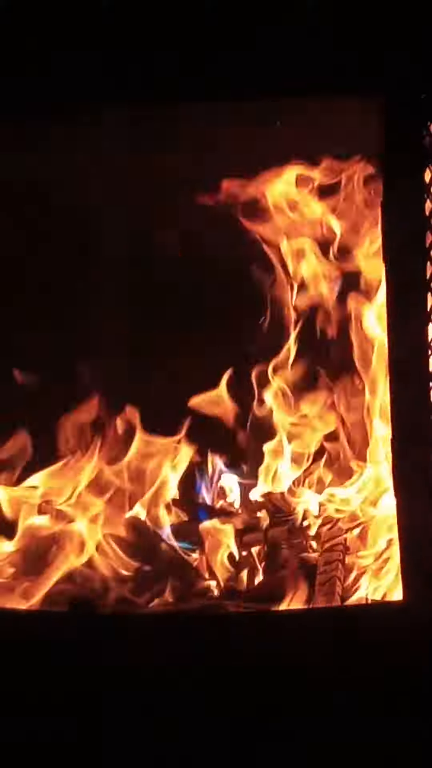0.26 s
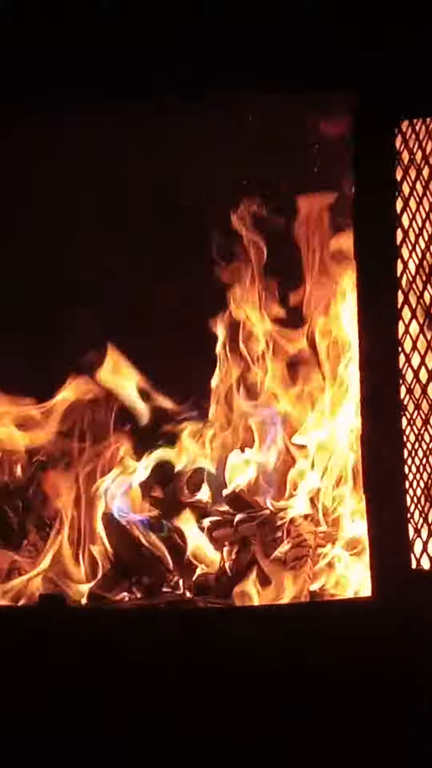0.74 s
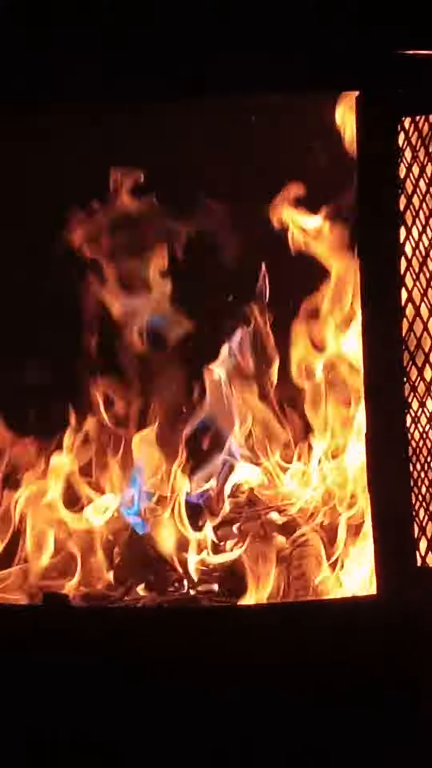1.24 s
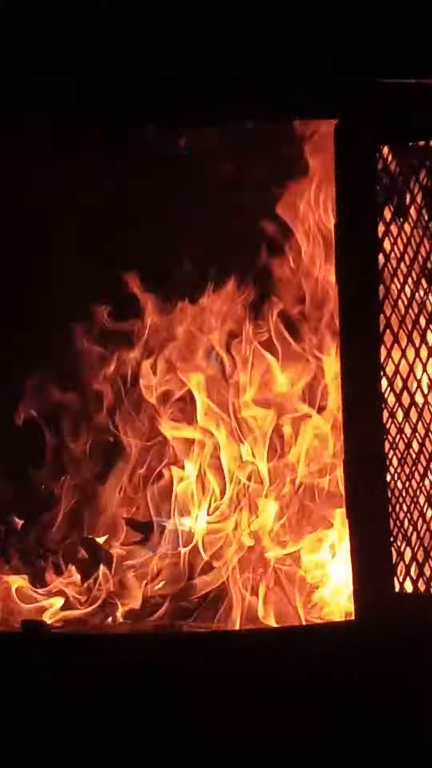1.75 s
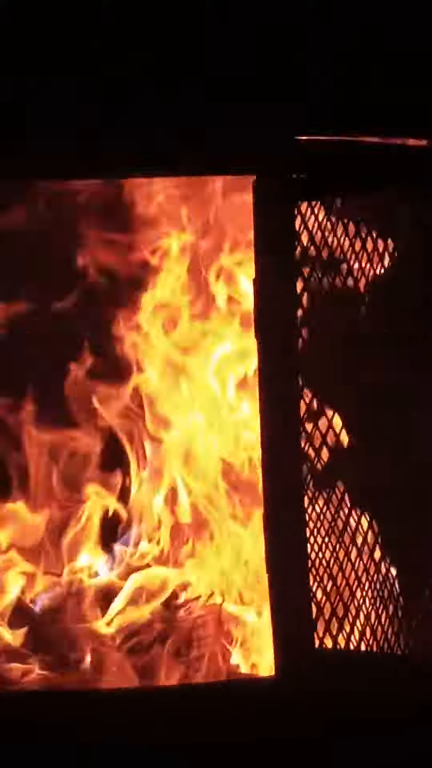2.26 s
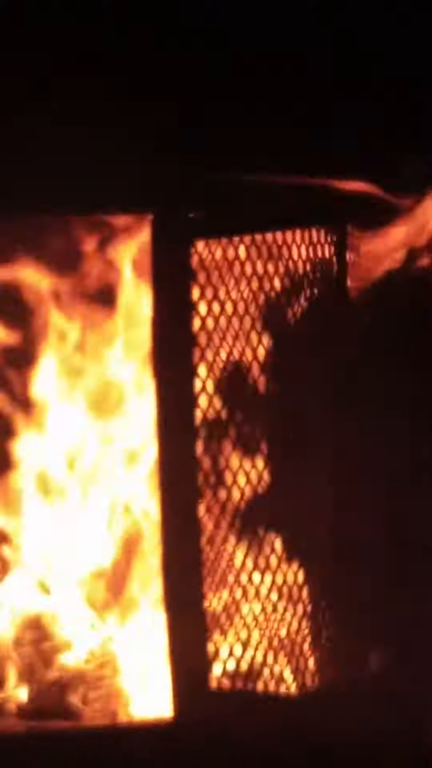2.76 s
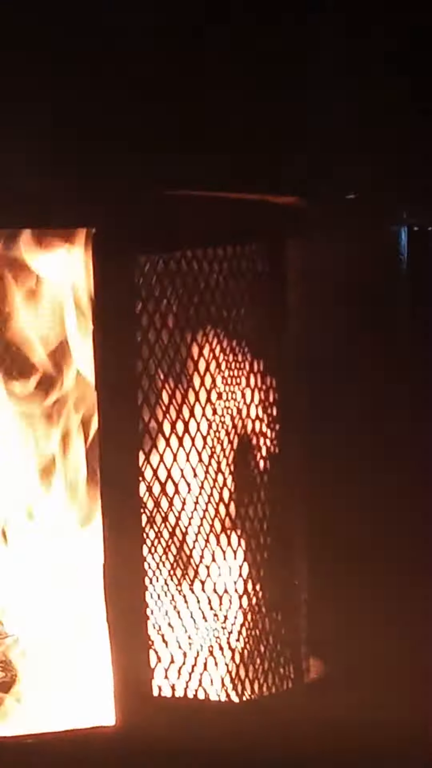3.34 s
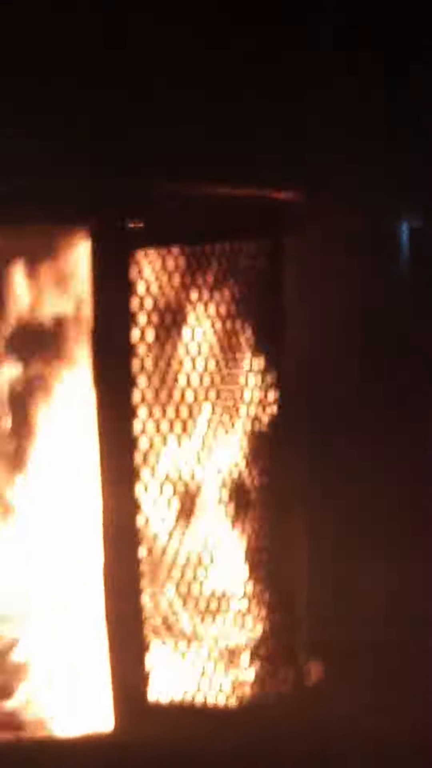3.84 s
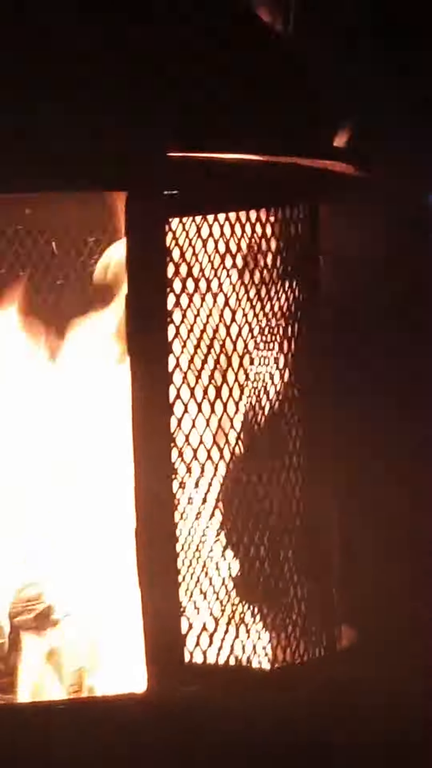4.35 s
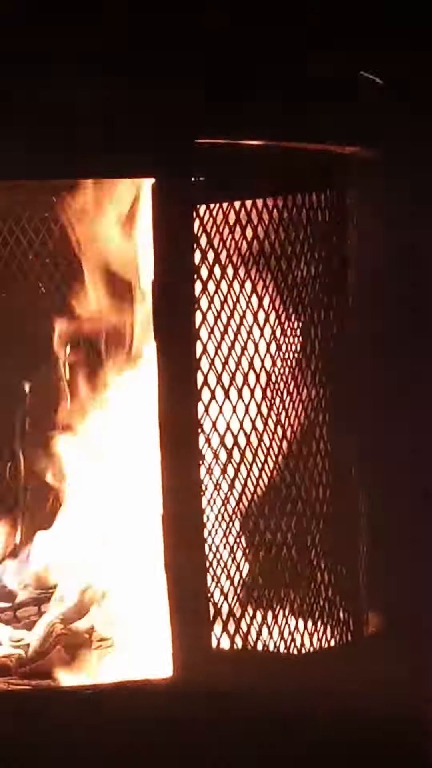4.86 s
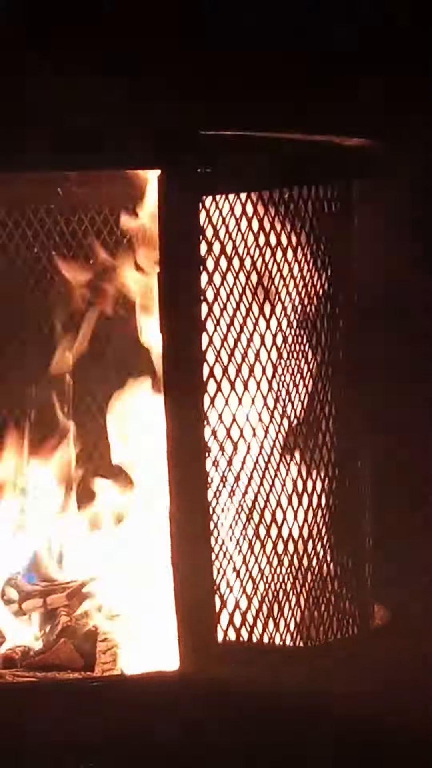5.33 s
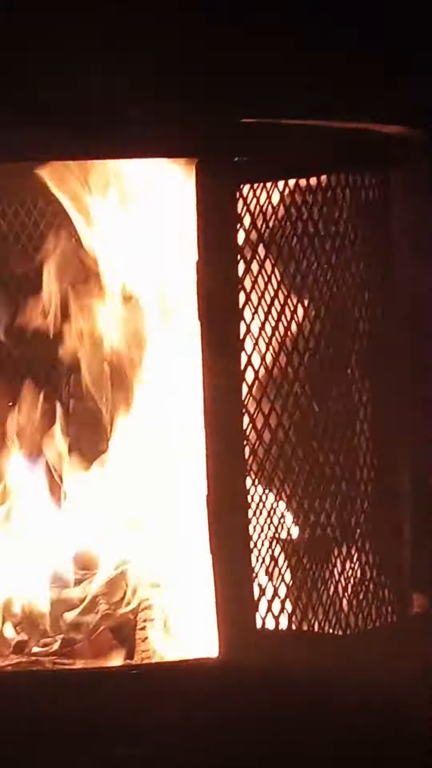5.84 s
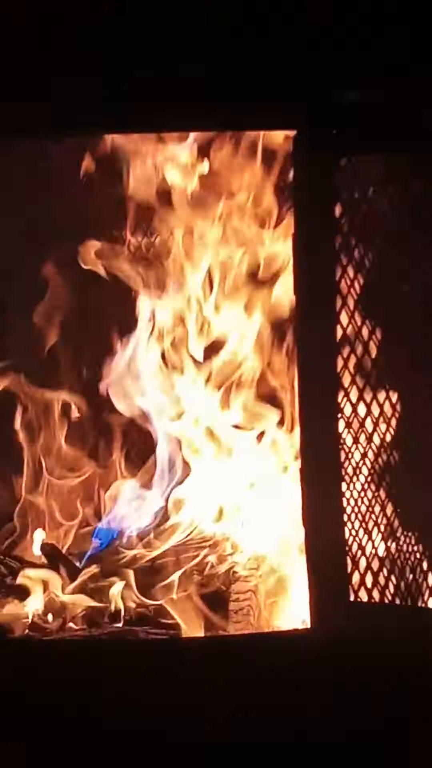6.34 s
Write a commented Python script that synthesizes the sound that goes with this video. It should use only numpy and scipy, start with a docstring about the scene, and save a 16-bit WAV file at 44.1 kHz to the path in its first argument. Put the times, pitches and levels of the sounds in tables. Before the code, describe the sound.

Dry snaps, tiny ticks and occasional hard pops burst from burning logs in a steel fire pit, with brief gas hisses between.

```python
"""A sharp pop opens the scene, then cracks and faint ticks scatter over a softly fluttering, hissing wood fire.
The place is a steel fire pit outdoors at night, with a small microphone close to it.
Gas pockets burst in the logs: each pop is a short noise burst in the resonances of pit and microphone.
A nearby wall answers once and the yard dies away; cracks go on hissing as noise through sliding resonances.
Flames are patchy noise over steadier hiss; low rumbles give their puffs and the thumps under the loudest pops."""
import sys
import numpy as np
from scipy import signal
from scipy.fft import rfft, irfft, next_fast_len
from scipy.io import wavfile
from scipy.ndimage import uniform_filter1d, map_coordinates

SR = 44100
rng = np.random.default_rng(int(sys.argv[2]) if len(sys.argv) > 2 else 0)


def unload_audio(sound):
    """Save the sound as a 16-bit wav file, at the path given as the first command line argument."""
    columns = np.transpose(np.atleast_2d(sound))
    # keep every value between -1 and 1, then stretch to whole-number steps
    steps = np.round(np.clip(columns, -1, 1) * 32767)
    wavfile.write(sys.argv[1], SR, steps.astype(np.int16))


N = 290619


def amp(db):
    """Gain of a level in dB."""
    return 10 ** (np.asarray(db) / 20)


def unit(x):
    """x at rms 1."""
    return x / np.sqrt(np.mean(x ** 2) + 1e-20)


def along(points, hz):
    """Read a curve of (frequency, value) points on a log frequency axis."""
    f, v = np.transpose(points)
    return np.interp(np.log(hz + 1), np.log(f + 1), v)


def wobble(rate):
    """A smooth random curve, rate knots a second."""
    knots = rng.standard_normal(int(N * rate / SR) + 4)
    return map_coordinates(knots, [np.arange(N) * rate / SR])


def filtered(x, response):
    """x times a complex response of frequency."""
    m = next_fast_len(x.shape[-1] + 8192)
    spectrum = rfft(x, m) * response(np.fft.rfftfreq(m, 1 / SR))
    return irfft(spectrum, m)[..., :x.shape[-1]]


def resonance(f, hz, width_hz):
    """A causal resonance of peak gain 1, applied twice for steep skirts."""
    return (1j * f * width_hz / (hz * hz - f * f + 1j * f * width_hz)) ** 2


def rush(spectrum, patchy_db, patch_shape):
    """Noise of rms 1 with patches of random gain; patch_shape = (bins, frames)."""
    z = signal.stft(rng.standard_normal(N), nperseg=1024)[2]
    field = uniform_filter1d(rng.standard_normal(z.shape), size=patch_shape[0], axis=0)
    field = uniform_filter1d(field, size=patch_shape[1], axis=1)
    noise = signal.istft(z * amp(patchy_db * unit(field)), nperseg=1024)[1][:N]
    return unit(filtered(noise, lambda hz: amp(along(spectrum, hz))))


# colour of the flutter: (frequency [Hz], relative level per Hz [dB])
FLUTTER_SPECTRUM = [(15, -81), (25, -50), (81, -15), (198, -0.5), (335, -5), (372, -11.5), (525, -15),
                    (900, -13), (1170, -47), (1980, -120)]
# colour of the burning gas: (frequency [Hz], relative level per Hz [dB])
HISS_SPECTRUM = [(180, -34), (300, -7), (549, -1), (987, -13), (1400, -4), (2130, -14), (2480, -8.5),
                 (2740, -15), (4850, -19.5), (5190, -19), (6450, -17.5), (7630, -27.5), (8730, -30),
                 (15200, -16), (16500, -35)]
# course of the flutter, before its random wobble: (time [s], level [dB])
FLUTTER_COURSE = [(0.0, -74), (0.53, -77.5), (1.3, -72), (1.54, -70), (1.78, -80), (2.31, -72), (2.62, -68),
                  (2.81, -77), (3.06, -80.5), (3.28, -77), (3.43, -74), (4.59, -74), (5.19, -72.5),
                  (5.43, -76.5), (6.22, -74), (6.59, -71)]
HISS_DB = -72.5


def flames():
    """Flames flutter in narrow rolling patches of low noise; burning gas hisses more evenly above."""
    flutter_db = np.interp(np.arange(N) / SR, *np.transpose(FLUTTER_COURSE))
    flutter = rush(FLUTTER_SPECTRUM, patchy_db=3.5, patch_shape=(4, 4))
    hiss = rush(HISS_SPECTRUM, patchy_db=1.2, patch_shape=(14, 5))
    return amp(flutter_db + 1.7 * wobble(4.3)) * flutter + amp(HISS_DB) * hiss


# low puffs of flame, and the low thumps under the loudest pops:
# (middle [s], level [dB], centre [Hz], length [s]); the whole swell and fade lasts 1.9 lengths
PUFFS_AND_THUMPS = [(0.947, -70.5, 218, 0.17), (1.108, -55.5, 300, 0.039), (1.171, -48.5, 237, 0.032),
                    (1.244, -67.5, 200, 0.091), (1.5, -70.5, 198.3, .12), (1.72, -54.5, 299, 0.041),
                    (2.0, -65, 240.6, 0.043), (2.028, -72, 244, 0.043), (2.092, -68.5, 261, 0.05),
                    (2.171, -61.5, 229, 0.04), (2.223, -68, 300, 0.058), (2.33, -71, 237, 0.08),
                    (2.678, -85, 280, 0.085), (3.301, -67.5, 620, .12), (3.419, -76, 149, 0.097),
                    (3.6, -72, 510, 0.064), (5.1, -74.5, 215, 0.13), (5.471, -66, 198.7, 0.063),
                    (5.7, -69, 319.6, 0.082), (6.561, -68.5, 245, 0.054)]


def puffs_and_thumps():
    """Each puff or thump is a narrow rumble that swells and fades."""
    out = np.zeros(N + SR)
    for middle, level_db, centre_hz, length in PUFFS_AND_THUMPS:
        n = round(1.9 * length * SR)
        noise = rng.standard_normal(n)
        rumble = unit(filtered(noise, lambda f: resonance(f, centre_hz, .7 * centre_hz)))
        out[round(middle * SR) - n // 2:][:n] += amp(level_db) * np.hanning(n) * rumble
    return out[:N]


# gas hissing or whistling from a crack: (start [s], swell [s], length [s], level [dB],
# fade after the swell [dB/s], first gush over the level [dB], centre [Hz],
# width before 40 Hz is added [Hz], fall of the centre [Hz/s])
GAS_JETS = [(.065, .007, 0.031, -59.5, 600, -11, 6800, 3780, 0), (.58, .03, 0.16, -75, 0, -4, 3520, 120, 2),
            (0.618, .08, 0.12, -66.5, 148, -17, 6000, 2400, 3),
            (.808, .004, 0.056, -63.5, 88, -1, 3750, 2000, 0),
            (1.092, .005, 0.024, -52, 100, -1, 3400, 3700, 0),
            (1.18, .002, 0.19, -49.5, 110.5, 0, 1250, 1400, 0),
            (1.41, .01, 0.042, -75.5, 99.5, -2.5, 5900, 3000, 0),
            (1.607, .01, 0.11, -73, 0, -3, 5630, 910, -1),
            (1.71, 0.0018, 0.44, -54.5, 34, 26, 3320, 870, 700.5),
            (1.713, 0.0016, .34, -67.5, 52, 38, 6680, 915, 0),
            (1.816, 0.028, 0.059, -52.5, 100, 1, 3150, 1700, 0),
            (1.828, .02, 0.074, -72, 153, -13, 6400, 1400, 0),
            (2.95, .1, 0.62, -78, -3, 9, 3680, 2200, -7.5),
            (2.97, 0.026, 0.82, -70, 18, -2, 6420, 803, -2.5),
            (3.017, 0.13, .58, -69.5, 25, 0, 5400, 200, 0), (3.05, .003, 0.26, -74, 1, 10, 2320, 60, 302),
            (3.35, .06, 0.23, -70, 20.5, 0, 2270, 60, 407),
            (4.08, .035, .47, -52.5, 110.5, -0.5, 6150, 1330, 1),
            (5.973, 0.35, 0.36, -64.5, -0.5, -0.5, 4490, 3240, -2),
            (5.978, 0.052, .332, -74, 7, 2.5, 5550, 249.3, 0),
            (5.99, 0.12, 0.49, -70.5, 10, 2, 6850, 400, 1), (6.1, 0.22, 0.19, -68.5, 0, 2, 3480, 180, 0),
            (6.334, .002, .3, -48.5, 68, -6, 4700, 5030, -2500),
            (6.337, .002, .3, -62, 110, 17, 13000, 9000, 0)]
SWELL_DB = 16  # rise over the swell
GUSH_S, CLOSE_S = 0.035, 0.02  # time constant of the gush's dB; closing time


def jets():
    """Sputtering noise through each crack's resonance: it swells, changes with the pressure, slides and closes."""
    out = np.zeros(N)
    for start, swell, length, level_db, fade, gush_db, centre_hz, width_hz, sag in GAS_JETS:
        f, t, z = signal.stft(rng.standard_normal(N), SR, nperseg=512)
        sliding_hz = centre_hz - sag * np.clip(t - start, 0, length)
        shape = np.abs(resonance(f[:, None], sliding_hz, abs(width_hz) + 40))
        # random narrow ripples in the hiss spectrum, fixed through each jet
        shape *= amp(3 * uniform_filter1d(rng.standard_normal((len(f), 1)), size=2, axis=0))
        shape = shape / np.sqrt(np.mean(shape ** 2, axis=0))
        noise = signal.istft(z * shape, SR, nperseg=512)[1][:N]
        u = np.clip(np.arange(N) / SR - start, 0, None)  # seconds since the start
        now_db = level_db - SWELL_DB * np.clip(1 - u / swell, 0, 1)
        now_db = now_db - fade * np.clip(u - swell, 0, None) + gush_db * np.exp(-u / GUSH_S)
        closing = np.clip((length - u) / CLOSE_S + .5, 0, 1)
        gain = amp(now_db) * (u > 0) * closing
        sputter = unit(amp(3 * wobble(90) + 1.2 * wobble(22)))
        out += gain * noise * sputter
    return out


# dying away of the surroundings: (frequency [Hz], time to fall 60 dB [s])
YARD_DECAY = [(300, 0.11), (1000, 0.16), (2500, 0.25), (6000, 0.13), (9000, .12), (14000, 0.091)]


def yard(sound, click, echo_db, tail_db):
    """A wall answers once, then grains die away, each frequency at its own speed; far things answer longer."""
    hz, t, z = signal.stft(rng.standard_normal(SR // 3), SR, nperseg=256)
    decay_db = -60 * t / along(YARD_DECAY, hz)[:, None]
    # a random gain for each frequency makes the tail's colour uneven
    z *= amp(4.1 * rng.standard_normal((len(hz), 1)))
    near, far = amp(decay_db), amp(-30 + 0.15 * decay_db)
    tail = signal.istft(z * (near + far), SR, nperseg=256)[1]
    grains = np.repeat(amp(2.2 * rng.standard_normal(len(tail) // 128 + 1)), 128)
    tail *= grains[:len(tail)]
    delayed = np.pad(tail / np.linalg.norm(tail), (round(0.0036 * SR), 0))
    out = signal.fftconvolve(click, amp(tail_db) * delayed)
    out[:len(sound)] += sound
    out[round(.0168 * SR):][:len(sound)] += amp(echo_db) * sound  # the wall
    return out


# resonances that a pop excites, in the order thud, knock, crack, snap, spit:
# (usual centre [Hz], width of a single pass [Hz])
POP_RESONANCES = [(600, 610), (1700, 880), (3700, 1060), (6200, 1200), (14300, 4700)]


def burst(strengths_db, knock_hz, crack_hz, t60):
    """One pocket: noise swelling in a millisecond and dying in the resonances; also a click of similar colour."""
    t = np.arange(1536) / SR
    swell = 1 - np.exp(-(t / 0.00095) ** 2)
    shape = swell * amp(-60 * t / np.clip(t60, .002, .04))
    centres, widths = np.transpose(POP_RESONANCES)
    centres[1:3] = knock_hz, crack_hz  # the size of the pocket sets these two

    def ring(x, hz, width_hz):
        """x in every resonance, one per row, with the lows below it thinned."""
        hz, width_hz = hz[:, None], width_hz[:, None]
        return filtered(x, lambda f: resonance(f, hz, width_hz) * (1j * f / (1j * f + hz / 2)) ** 2)

    def energy(x):
        """Every resonance gets energy in proportion to the swell-and-decay shape."""
        size = np.linalg.norm(shape) / shape.max() / 2
        return size * x / np.linalg.norm(x, axis=1, keepdims=True)

    parts = ring(shape * rng.standard_normal(len(t)), centres, widths)
    # what leaves in all directions is broader and duller
    clicks = ring(1. * (t == 0), .9 * centres, 1.3 * widths)
    return amp(strengths_db) @ energy(parts), amp(strengths_db) @ energy(clicks)


# clear pops: (time [s], body level [dB], body pitch over 1 kHz, held between -0.8 and 1.9 [octaves],
# breadth, at least 0.3 [octaves], shift of knock and crack [octaves],
# snap level [dB], spit level [dB], reverberation over the click [dB]);
# snap and spit are levels over the body
CLEAR_POPS = [(0.001, -24, 0.61, 1.73, -0.088, -8, -24, -15), (0.0683, -67, 8, 2.5, -0.05, 11, 5, -9),
              (0.1708, -67.5, 4, 2.2, -0.013, 13, 12, -4), (0.2996, -45, 0.59, 5.8, 0.01, -15, -33, -2.5),
              (0.3504, -52, 1.8, 3, 0.047, -3, -21, -5), (0.3687, -31.5, 1.82, 0.55, -0.11, -3.5, -7, -16),
              (0.4404, -63, 2, 1.8, 0.12, 4, -14, -10), (0.5137, -44, 2.3, 0.34, 0.26, 8, 5.5, -5),
              (0.5423, -45, 1.76, 0.78, 0.18, 3.5, 4, -7), (0.6446, -74, -0.2, 2.5, -0.11, -1, 31, -14),
              (0.6941, -51.5, 2.9, 1.9, 0.16, 11.5, 11, -9), (0.842, -55.5, 1.8, 1.8, 0.23, -1.5, -8, -12),
              (0.9443, -46, 2, 0.92, 0.022, -9.5, -11, -13), (1.0002, -48.5, 2.4, 0.52, 0.19, 5, -8, -12),
              (1.0163, -59, 2.2, 1.8, 0.12, -4, -10, -12), (1.0509, -50, 2.7, 0.43, 0.26, 9.5, 5.5, -11),
              (1.0949, -42.5, 1.3, 2, 0.26, -6, -14, -11.5),
              (1.1235, -37.5, 1.9, 1.15, -0.037, -0.5, -13, -12),
              (1.1332, -37.5, 2.1, 0.98, -0.19, 1, -13.5, -10),
              (1.168, -4, 0.69, 0.88, -0.27, -6.5, -28, -16.5),
              (1.198, -34.5, 0.063, 1.3, -0.21, -15, -29, -12),
              (1.2143, -37.5, 1.8, 2.2, -0.04, -17, -15, -11),
              (1.2292, -28.5, 1.9, 1.8, 0.02, -12.5, -9, -15),
              (1.2537, -48, -7.53, 1.1, -0.18, -4.5, 4, -12), (1.2883, -58, 3, 0.9, -0.16, 10, 13.5, -3.5),
              (1.6039, -61, 0.13, 2.9, -0.07, 6.5, 5, -13), (1.7041, -10, 2.3, 3.9, -0.31, -9, -26.5, -12),
              (1.7932, -34, 5, 0.36, -0.23, -30, -47, -22), (1.8856, -48.5, 2, 2.4, -0.081, -3, -1, -7),
              (1.9628, -44.5, 2.24, 1.26, -0.13, -30, -38, -12),
              (1.9844, -40, 2, 0.54, -0.51, -31, -42, -9), (2.0889, -60, -0.45, 1.0, 0.04, 4, -19, -15),
              (2.1684, -55, -0.62, 1.9, -0.15, 7, -6, -14), (2.1752, -35, 1.9, 1, 0.016, -2.5, -10, -12),
              (2.2404, -32, 2.26, 1.24, -0.02, 0.5, 1, -13.5),
              (2.2494, -35.5, 0.88, 1.25, -0.4, 5, 10, -14),
              (2.4416, -38.5, 1.9, 0.72, 0.02, -29, -38.5, -19),
              (2.522, -18, 0.69, 1.6, -0.012, -8.5, -22.5, -11),
              (2.728, -20, 1.02, 1.47, -0.27, -8.5, -12, -12.5),
              (2.7548, -20, 0.65, 1.43, -0.1, -8, -11.5, -12), (2.828, -59.5, 9, 1.3, 0.07, 7.5, 2, -11.5),
              (2.8605, -54.5, 0.67, 0.98, -0.078, 3, -3, -3), (2.8796, -49, 2.1, 1.06, 0.046, 9, 10.5, -4),
              (2.9951, -66, 0.6, 2.5, -0.14, 18, 22.5, -7), (3.0227, -42.5, 1.8, 1.5, 0.27, 1, -21, -3),
              (3.0341, -22.5, 1.15, 0.97, 0.033, -6, -6, -14.5), (3.1076, -57, 1.8, 1.55, 0.01, 7, -1, -8),
              (3.1758, -62, -0.8, 2.5, 0.13, 9, 6, -10), (3.2272, -50.5, 1.8, 1.1, 0.14, 4.5, 0, -6),
              (3.2429, -34.5, 0.74, 1.32, -0.22, -6.5, -29, -11),
              (3.3503, -24, 1.24, 0.61, 0.11, -0.5, -8, -12), (3.4144, -58.5, -1.5, 1.5, 0.29, 3, -22, -10),
              (3.4461, -50, 1.8, 1.46, -0.022, 22, 7, -11), (3.4515, -39.5, 2.1, 0.78, 0.17, 0, 0, -12),
              (3.5074, -60, 1.7, 2.7, 0.051, 10, -5, -12), (3.5485, -43.5, 2, 0.88, 0.095, -5.5, -28, -12),
              (3.6177, -61.5, 1.8, 2.1, 0.028, 10, 6, -7.5), (3.6414, -60.5, 2, 1, -0.011, 8, 15.5, -1),
              (3.682, -28.5, 1.74, 0.94, 0.061, -3, -15, -17), (3.8729, -50, 2.2, 1.5, -0.026, 13, 17, -12),
              (3.9368, -29, 1.42, 1.05, -0.075, -4, 0, -15.5),
              (4.034, -47.5, 2, 0.81, 0.1, 3.5, -14, -10.5), (4.0703, -17, 2.48, 2.05, -0.11, 9, -9, -11.5),
              (4.1441, -29.5, 2.23, 5.1, -0.16, -11, -42, -10.5),
              (4.2518, -57.5, 1.8, 1.8, 0.089, 8.5, 9, -12),
              (4.2841, -58, 1.3, 0.9, -0.04, 11.5, 6.5, -14.5),
              (4.6878, -63.5, 0.95, 0.9, -0.27, 5.5, 3, -10),
              (4.8056, -55, 1.8, 1.25, 0.1, -3, -12.5, -5.5), (4.8816, -42.5, 1.8, 1.1, -0.1, -4, -20, -9),
              (4.9085, -56.5, 2.1, 2, 0.13, 6, -12, -5), (4.9372, -58.5, 1.8, 1.7, 0.14, 16, 11.5, -12),
              (4.9845, -67, 1.8, 1.9, 0.032, 10, 5, -12), (5.0031, -53, 1.9, 1.2, 0.025, -4, -12, -14),
              (5.1442, -56.5, 0, 1.2, -0.12, -3.5, -11, -8.5),
              (5.26, -68, 0.7, 2.6, -0.014, 12.5, 15.5, -15),
              (5.3344, -66, -2, 1.1, -0.22, -7.5, 11.5, -12),
              (5.4365, -40, 1.77, 1.02, -0.079, 6.5, 12.5, -12),
              (5.4635, -37.5, 1.9, 1.7, -0.07, -9, -13.5, -10.5),
              (5.4834, -56.5, 1.7, 1.85, -0.0024, 16, 19.5, -10.5),
              (5.5836, -63, -1, 1.3, -0.15, 13.5, 4, -16),
              (5.5921, -43, 2.15, 1.03, -0.09, -2.5, -22.5, -8.5),
              (5.8554, -56.5, -1, 1.9, -0.22, 2.5, -3.5, -8),
              (5.9826, -58.5, 1.8, 2.4, -0.04, 15.5, 13, -7),
              (6.1299, -57.5, -1.34, 1.44, 0.04, -7, -14, -9), (6.1451, -61, 1.7, 2.7, 0.0, 13, -2.5, -12),
              (6.215, -49, 1.8, 2.4, 0.037, -9, -7, -7), (6.2224, -32.5, 2.2, 1.3, -0.083, -15, -17, -13.5),
              (6.3152, -21, 2.45, 1.88, 0.07, 10.5, 6, -13.5), (6.3312, -26, 1.9, 1.46, 0.48, 8.5, 0, -11),
              (6.3656, -42, 1.3, 1.6, -0.01, 1, 0, 0.5), (6.4253, -43.5, 2, 0.77, 0.04, -1, -19, -5.5),
              (6.4843, -56, -9, 3.6, 0.14, 16.5, 14, -17), (6.5369, -59, 1.8, 2.5, -0.11, 8, 5, -12),
              (6.5731, -56.5, 2, 1.8, 0.04, 1, -22, -10)]
BREADTH_DB = 6  # a resonance one breadth away from the pitch is this much weaker
POP_T60_S = 0.015  # usual time to fall 60 dB; each pop varies it
TICK_DB, TICK_PITCH, TICK_BREADTH = -76, 1.8, 1.2  # faintest body [dB]; mean pitch, breadth [octaves]


def pops():
    """Bursting pockets: the clear pops, and many faint bright ticks at random moments."""
    when, shade = rng.random((70, 2)), rng.standard_normal((70, 4))
    ticks = [(s * N / SR, TICK_DB + 7 * size, TICK_PITCH + .4 * a, TICK_BREADTH,
              .12 * b, 7 + 5 * c, 2 + 6 * d, -5)
             for (s, size), (a, b, c, d) in zip(when, shade)]
    usual_hz = np.transpose(POP_RESONANCES)[0]
    out = np.zeros(N + SR)
    for s, body_db, pitch, breadth, shift, snap_db, spit_db, tail_db in list(CLEAR_POPS) + ticks:
        # the body is shared among thud, knock and crack
        distance = np.log2(usual_hz[:3] / 1000) - np.clip(pitch, -.8, 1.9)
        low_db = -BREADTH_DB * (distance / max(breadth, .3)) ** 2
        strengths_db = body_db + np.array([*low_db, snap_db, spit_db])
        knock_hz, crack_hz = usual_hz[1:3] * 2 ** shift
        t60 = POP_T60_S * 2 ** rng.normal(0, 0.21)
        direct, click = burst(strengths_db, knock_hz, crack_hz, t60)
        sound = yard(direct, click, echo_db=-21, tail_db=tail_db)
        out[max(round((s - .0004) * SR), 0):][:len(sound)] += sound
    return out[:N]


def scene():
    """Everything reaches one microphone."""
    return (pops() + jets() + flames() + puffs_and_thumps())[None]


TOP_HZ = 16000  # band limit


def record(dry):
    """The recorder keeps little above its band limit and almost nothing a little higher."""
    edges_hz = [TOP_HZ - 150, TOP_HZ + 150, TOP_HZ + 700, TOP_HZ + 950]
    return filtered(dry, lambda hz: amp(np.interp(hz, edges_hz, [0, -16, -20, -140])))


dry = scene()
out = record(dry)
unload_audio(out)
```